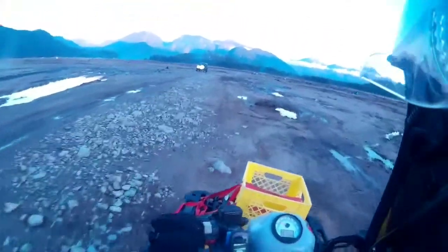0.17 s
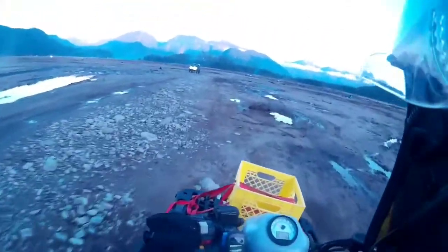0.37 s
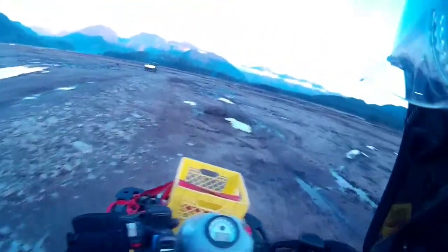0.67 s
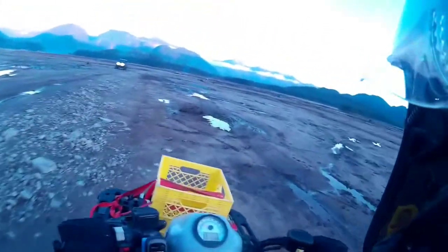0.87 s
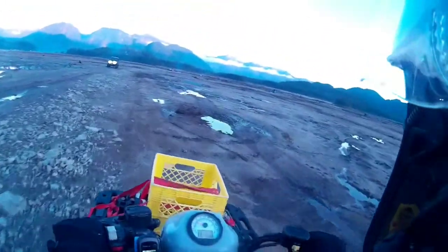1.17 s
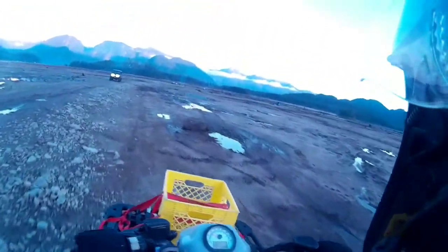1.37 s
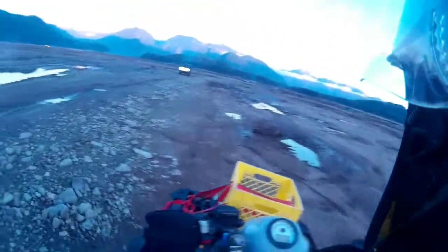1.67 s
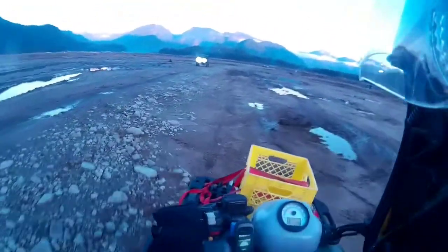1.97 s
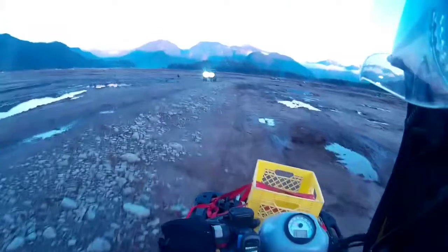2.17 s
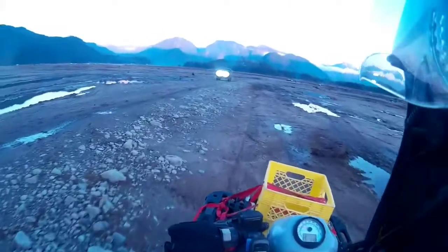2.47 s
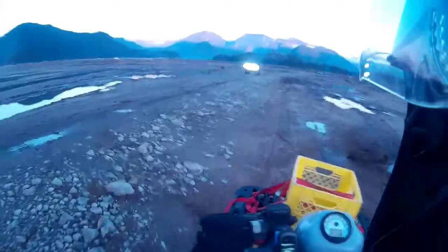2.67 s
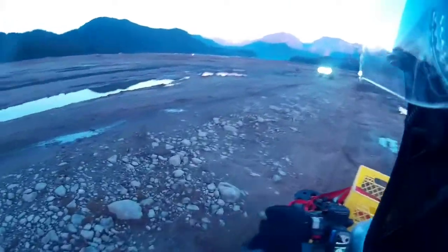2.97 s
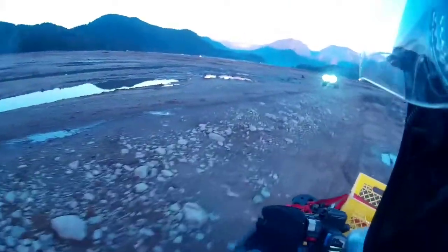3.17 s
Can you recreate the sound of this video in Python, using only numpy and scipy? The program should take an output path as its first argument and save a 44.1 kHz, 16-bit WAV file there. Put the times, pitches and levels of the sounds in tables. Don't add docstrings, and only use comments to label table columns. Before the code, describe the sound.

A quad engine drones steadily, muffled and throaty, with light plastic rattles over bumps.

```python
import sys
import numpy as np
from scipy import signal
from scipy.fft import rfft, irfft
from scipy.io import wavfile

SR = 44100
rng = np.random.default_rng(int(sys.argv[2]) if len(sys.argv) > 2 else 0)


def waveform_to_disk(signal):
    frames = np.transpose(np.atleast_2d(signal))
    scaled = np.clip(frames, -1, 1) * 32767
    samples = np.round(scaled).astype(np.int16)
    wavfile.write(sys.argv[1], SR, samples)


def nominal_scale(level):
    x = np.asarray(level, float) / 20
    return 10 ** x


N = 146412


def rms_one(x):
    return x / np.sqrt(np.mean(x ** 2) + 1e-20)


def in_time(rows):
    return np.interp(np.arange(N) / SR, *np.transpose(rows))


def at_hz(points, hz):
    point_hz, point_db = np.transpose(points)
    return np.interp(np.log(hz), np.log(point_hz), point_db)


def resonance_db(hz, peaks):
    return sum(db / (1 + (2 * (hz - centre) / width) ** 2) for centre, width, db in peaks)


def drift(rate_hz):
    step = 40
    pole = np.exp(-2 * np.pi * rate_hz * step / SR)
    settle = 2000
    chance = rng.standard_normal(N // step + settle + 2)
    slow = signal.lfilter([1], [1, -2 * pole, pole * pole], chance)[settle:]
    return np.interp(np.arange(N) / step, np.arange(len(slow)), rms_one(slow))


def coloured(gain_db, low_hz, high_hz, patchy_db):
    hz = np.maximum(np.arange(N // 2 + 1) * SR / N, 1)
    noise = rfft(rng.standard_normal(N)) * nominal_scale(gain_db(hz))
    together = drift(3.5)
    out = 0
    for centre in low_hz * 2 ** np.arange(0, np.log2(high_hz / low_hz), 1 / 3):
        share = np.cos(np.clip(3 * np.log2(hz / centre), -1, 1) * np.pi / 2) ** 2
        flicker_db = patchy_db * (.4 * together + drift(6.0))
        out = out + irfft(noise * share, N) * nominal_scale(flicker_db)
    return rms_one(out)


def preamp():
    # frequency in Hz, density in dB per Hz
    hiss_colour = [(4500, -1.5), (5000, -6), (5550, 6), (6200, 1.5), (7300, 3.5), (9000, 1), (14400, 0.4),
                   (15500, -5.5)]
    # frequency in Hz, level in dB
    whine_lines = [(9416.5, -98), (9452.8, -99), (9489.1, -88), (9525.4, -87), (9561.7, -88), (9634.3, -97)]
    out = nominal_scale(-71) * coloured(lambda hz: at_hz(hiss_colour, hz), 4000, 17000, patchy_db=.15)
    t = np.arange(N) / SR
    for hz, db in whine_lines:
        out = out + np.sqrt(2) * nominal_scale(db) * np.sin(2 * np.pi * (hz * t + rng.random()))
    return out


def cargo():
    # start in seconds, level in dB, main pitch in Hz
    knocks = [(0.2378, -25, 1490), (0.3157, -31, 1520), (0.391, -28, 1490), (0.799, -36, 1440),
              (1.1795, -26, 1390), (1.1974, -29, 1590), (1.238, -30, 1570), (1.3317, -32, 1570),
              (1.3674, -26, 1410), (1.5604, -40, 1450), (1.609, -23, 1440), (1.6894, -26, 1520),
              (1.7903, -23, 1490), (1.905, -21.5, 1500), (2.3652, -26, 1450), (2.6549, -40.5, 1470),
              (2.9194, -41, 1600), (3.144, -31, 1460)]
    # ratio to main pitch, level in dB, 60 dB decay time in seconds
    modes = [(.92, -4, .03), (1, 0, .045), (1.1, -6, .03), (1.5, -14, .025), (2.1, -19, .025),
             (2.95, -14, .03)]
    knock_db, rattle_s, contact_hz = -16, .008, 2600
    out, size = np.zeros(N + SR), SR // 8
    fade = np.exp(-np.arange(size) / SR / rattle_s)
    for start_s, db, pitch_hz in knocks:
        spray = rng.standard_normal(size) * (rng.random(size) < .02) * fade
        spray[0] = 2
        start = int(start_s * SR)
        for ratio, mode_db, t60 in modes:
            pole = nominal_scale(-60 / (t60 * SR))
            w = 2 * np.pi * ratio * pitch_hz / SR
            ring = signal.lfilter([0, np.sin(w)], [1, -2 * pole * np.cos(w), pole * pole], spray)
            out[start:start + size] += nominal_scale(db + knock_db + mode_db) * ring
    return signal.sosfilt(signal.butter(4, contact_hz, fs=SR, output="sos"), out[:N])


def panel(x):
    # time in seconds, level in dB
    swell = [
        (0, -35),
        (.7, -35.5),
        (1.0, -35.5),
        (1.45, -33.5),
        (1.7, -35.5),
        (2.05, -33.5),
        (2.3, -37.5),
        (3.32, -36.5),
    ]
    panel_hz, width_hz, share = 540, 80, 1.2
    edges_hz = [panel_hz - width_hz / 2, panel_hz + width_hz / 2]
    band = signal.sosfilt(signal.butter(1, edges_hz, "band", fs=SR, output="sos"), x)
    db = in_time(swell)
    return x + (nominal_scale(share * (db - db.mean())) - 1) * band


def roar(load_db, turns):
    # frequency in Hz, density in dB per Hz
    roar_colour = [(60, -13), (170, -9), (300, -3.5), (620, -2.5), (1000, -7), (2300, -30.5), (2800, -35),
                   (4800, -52.5)]
    # frequency in Hz, width in Hz, lift in dB
    case = [(511, 31, 2), (735, 120, 5), (1210, 23, 2.5), (1488, 31, 8), (2222, 640, 9), (3176, 240, 8.5),
            (3880, 280, 9), (4400, 350, 6)]
    # share of cycle after firing, width as share of cycle, lift in dB
    puffs = [
        (.0, .1, 5),
        (.4, .08, 4),
        (.71, .04, 3),
        (.84, .05, 3),
    ]
    split_hz, share_above = 950, .35

    def colour(hz):
        return at_hz(roar_colour, hz) + resonance_db(hz, case) - 30 * (hz > 5400)

    puff_db = 0
    for at, width, db in puffs:
        from_puff = (turns - at + .5) % 1 - .5
        puff_db = puff_db + db * np.exp(-(from_puff / width) ** 2)
    noise = coloured(colour, 40, 6000, patchy_db=1.0)
    hz = np.arange(N // 2 + 1) * SR / N
    low = irfft(rfft(noise) / (1 + (hz / split_hz) ** 8), N)
    puffed = rms_one(nominal_scale(puff_db)) * low + rms_one(nominal_scale(share_above * puff_db)) * (noise - low)
    return nominal_scale(-29.5 + load_db) * puffed


def exhaust(load_db, rate, turns):
    # multiple of the firing rate, level in dB
    orders = [(1, -21), (2, -11.5), (3, -12), (4, -1.7), (5, -.5), (6, -18), (7, -25), (8, -18), (9, -11.5),
              (10, -15.5), (11, -17), (12, -17.5), (13, -12), (14, -22), (15, -17.5), (16, -21), (17, -26),
              (18, -17.5), (19, -18), (20, -14.5), (21, -14.5), (22, -17), (23, -23), (24, -14),
              (25, -16.5), (26, -16.5), (27, -14), (28, -14.5), (29, -17.5), (30, -23)]
    # frequency in Hz,
    # width in Hz, lift in dB
    lifts = [(244, 24, 8), (332, 22, 7), (545, 40, 6)]
    silencer_hz, silencer_width_hz, silencer_stages = 118, 28, 1.8
    lag_hz, lag_width_hz = 110, 30
    tail_hz, tail_width_hz = 248, 15
    wander_db, wander_rad, load_share, upper_db = 3.2, .55, .6, 2.6

    def detuning(hz):
        return (hz - silencer_hz ** 2 / hz) / silencer_width_hz

    out = 0
    for k, db in orders:
        hz, mean_hz = k * rate, k * rate.mean()
        lift = 1
        if k < 7:
            lift = ((1 + detuning(mean_hz) ** 2) / (1 + detuning(hz) ** 2)) ** (silencer_stages / 2)
        lag = 0
        if 2 < k < 6:
            lag = np.arctan((mean_hz - lag_hz) / lag_width_hz)
        if 7 < k < 13:
            lag += 1.3 * np.arctan((mean_hz - tail_hz) / tail_width_hz)
        if k > 13:
            lag += rng.normal(0, 1.4)
        loose = np.clip((k - 2) / 17, .24, 1)
        phase = 2 * np.pi * k * turns - lag + loose * wander_rad * drift(3.0)
        level_db = db + loose * (upper_db + wander_db * drift(4.0) + load_share * load_db)
        level_db = level_db + resonance_db(hz, lifts) - resonance_db(mean_hz, lifts)
        out = out + lift * nominal_scale(level_db) * np.cos(phase)
    return np.sqrt(2) * nominal_scale(-28.5) * out


def scene():
    # time in seconds, firing rate in Hz
    speed = [(0.0, 26.67), (0.195, 26.25), (0.391, 26.79), (0.586, 27.01), (0.781, 26.41), (0.976, 26.54),
             (1.172, 26.51), (1.367, 25.9), (1.562, 26.04), (1.758, 26.57), (1.953, 26.46), (2.148, 25.55),
             (2.344, 25.66), (2.539, 26.04), (2.734, 25.81), (2.929, 25.53), (3.125, 25.36), (3.32, 26.27)]
    # time in seconds, level in dB
    load = [(0.05, -27), (0.78, -25.5), (0.8, -26.5), (1.03, -26), (1.56, -26.5), (1.58, -26),
            (1.64, -29.5), (1.69, -26), (1.88, -27), (1.91, -28.5), (2.08, -26), (2.33, -28), (2.93, -26.5),
            (3.25, -29)]
    first_firing = .075
    rate, load_db = in_time(speed), in_time(load)
    load_db = load_db - load_db.mean()
    turns = np.cumsum(rate) / SR - first_firing
    vehicle = panel(exhaust(load_db, rate, turns) + roar(load_db, turns))
    return (vehicle + cargo() + preamp())[None]


def band_limit(x):
    return signal.sosfilt(signal.butter(12, 15510, fs=SR, output="sos"), x)


def record(dry):
    return band_limit(dry)


dry = scene()
out = record(dry)
waveform_to_disk(out)
```